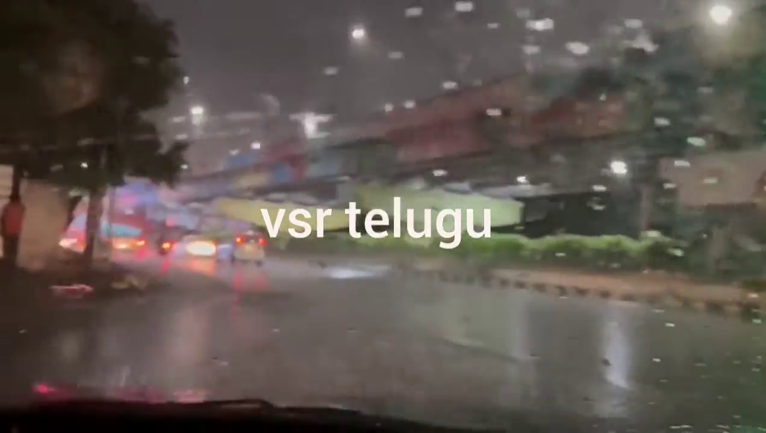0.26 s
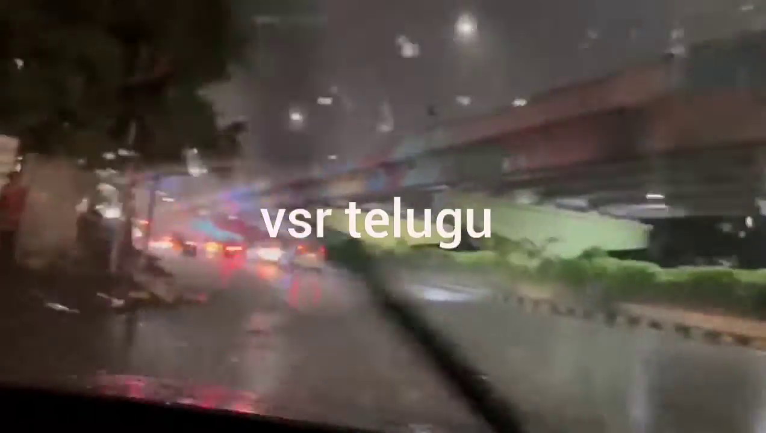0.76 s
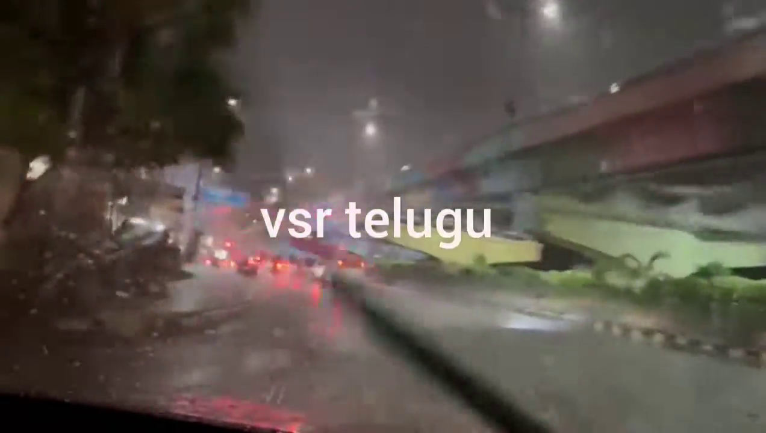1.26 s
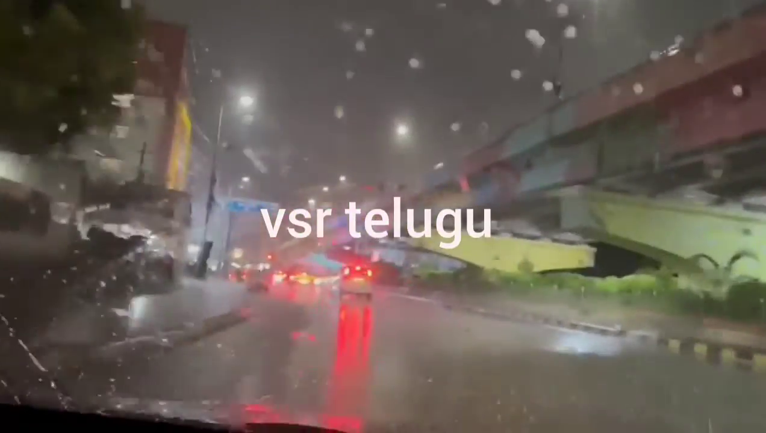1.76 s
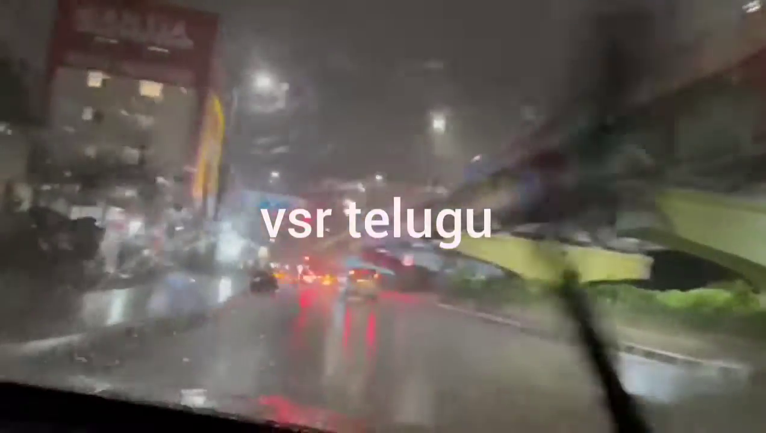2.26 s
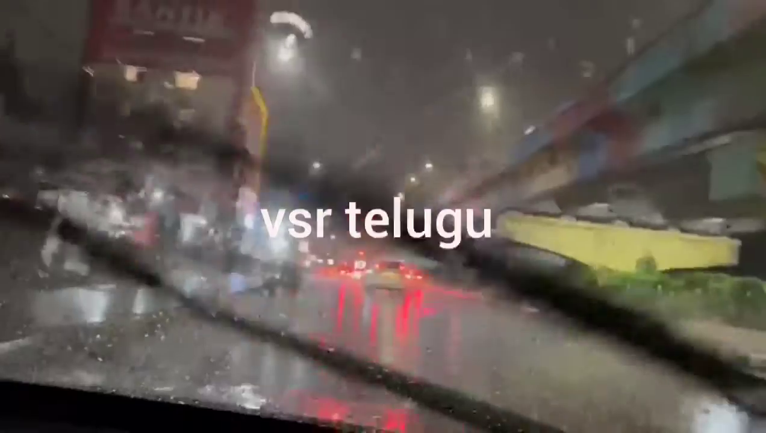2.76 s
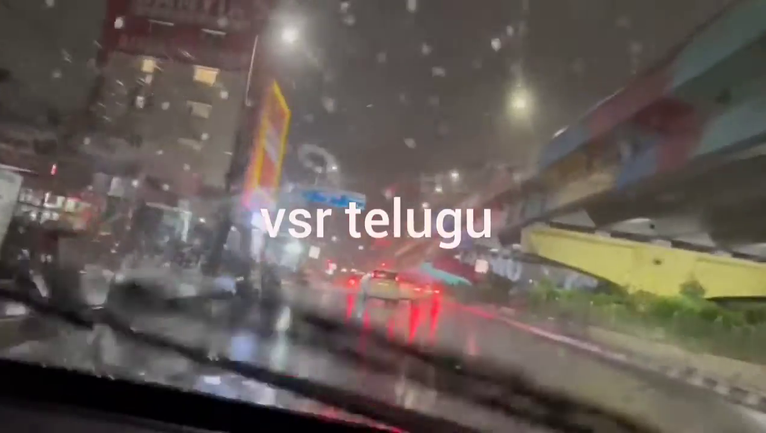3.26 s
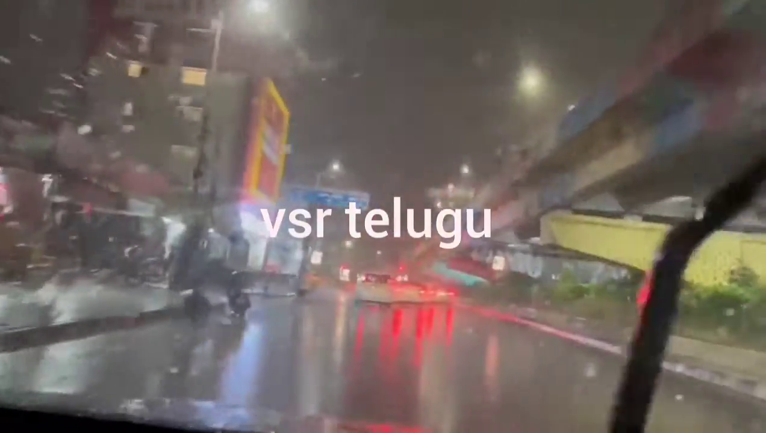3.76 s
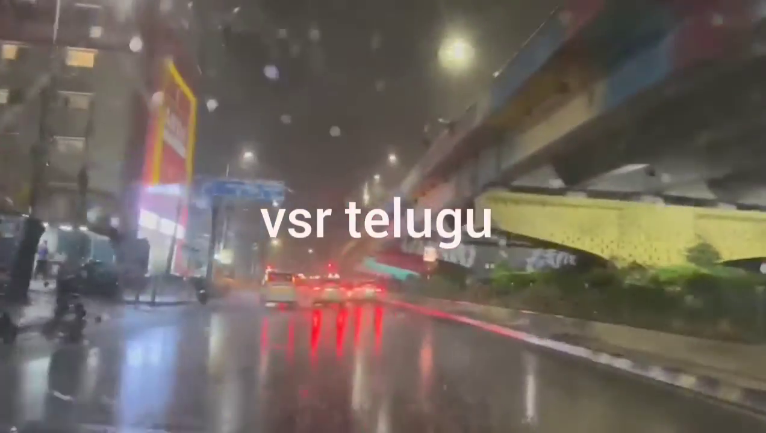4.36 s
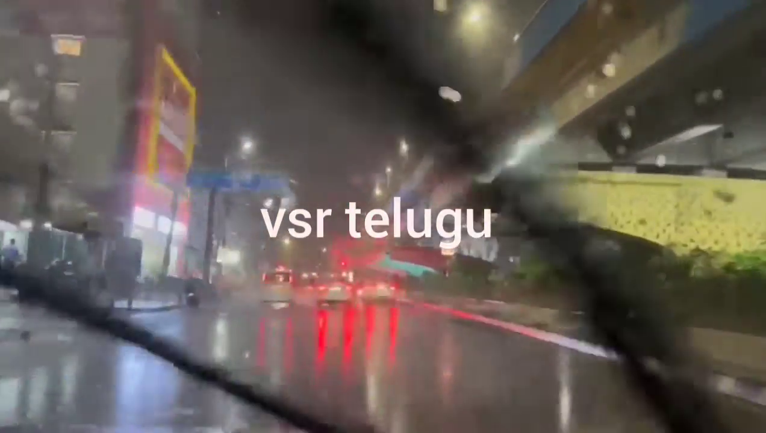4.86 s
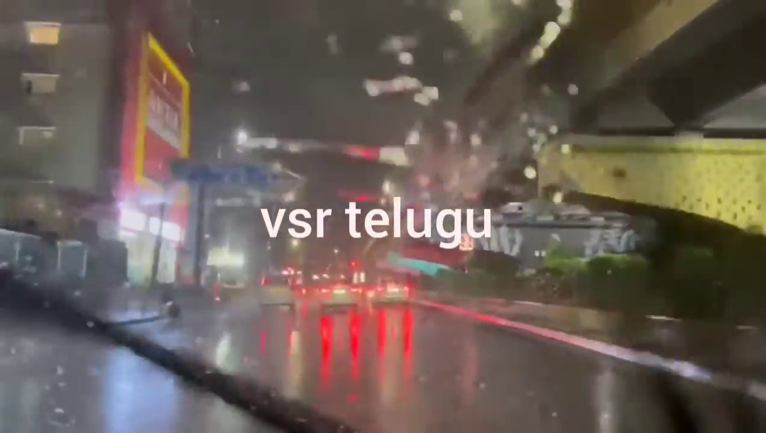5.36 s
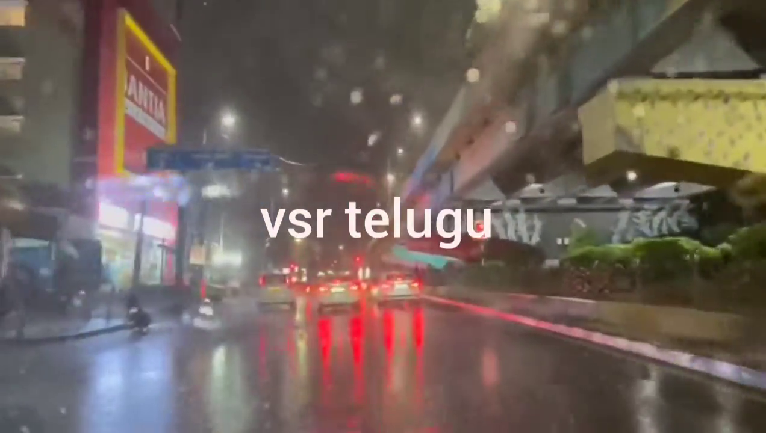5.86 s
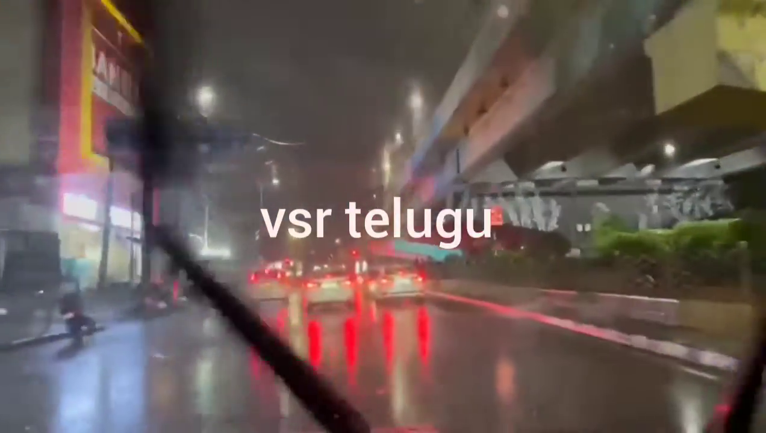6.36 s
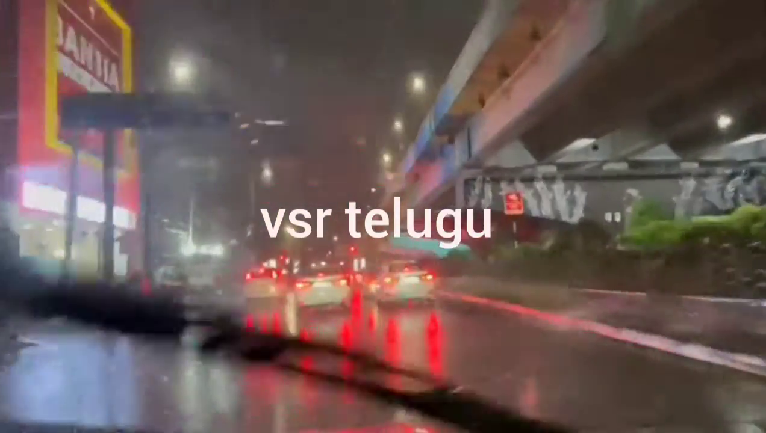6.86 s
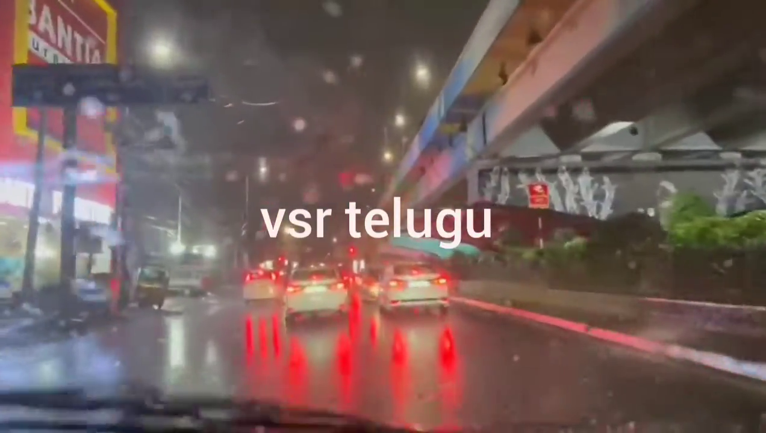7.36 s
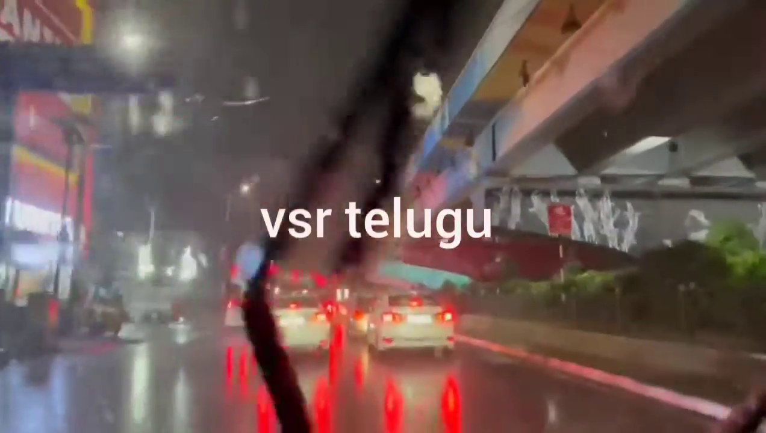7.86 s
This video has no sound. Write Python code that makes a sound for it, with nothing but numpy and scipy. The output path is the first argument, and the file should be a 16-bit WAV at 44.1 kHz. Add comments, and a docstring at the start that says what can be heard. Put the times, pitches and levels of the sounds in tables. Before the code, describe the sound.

Heavy rain crackles on a car's windscreen and roof, heard from inside, over low road rumble, with wiper thuds and faint rubber squeaks.

```python
"""Heavy rain patters on the roof and windscreen of a slowly moving car, heard from inside: filtered noise bursts.
Under it road and engine boom in the cabin's low modes, throbbing at bumps, and wet tyres hiss: noise and a hum.
The wiper blades thud at each end of their sweep (struck modes, noise swells and a low tone) and twice squeal
on the glass (wavering tones and narrow noise bands). Late on, one brief, very high, thin tone falls in pitch."""
import sys
import numpy as np
from scipy import signal
from scipy.fft import rfft, irfft, next_fast_len
from scipy.io import wavfile
from scipy.ndimage import uniform_filter1d, map_coordinates

SR = 44100
rng = np.random.default_rng(int(sys.argv[2]) if len(sys.argv) > 2 else 0)


def int16_out(signal):
    """Quantize to a 16-bit WAV file."""
    q = np.round(np.clip(np.atleast_2d(signal).T, -1, 1) * 32767)
    wavfile.write(sys.argv[1], SR, q.astype(np.int16))


N = 358533  # length in samples

# Course of the rain. Each row: time in seconds, patter level in dB before a common offset.
RAIN_LEVEL = [(0, -32), (.15, -35.5), (.3, -33.5), (.52, -36.5), (.65, -35), (1.27, -35.5), (1.86, -34),
              (2.42, -36), (2.85, -35.5), (3.45, -38), (4.1, -42.5), (4.27, -37), (4.7, -39.5), (5.08, -38),
              (5.48, -40), (5.8, -38), (6.5, -39.5), (8.13, -40.5)]
# Heavy drops on the glass. Each row: time in seconds, relative level in dB.
HEAVY_DROPS = [(0.1789, -27), (0.2348, -18), (0.2988, -18), (0.6029, -22), (0.7267, -22), (0.9744, -21),
               (0.9855, -23), (1.014, -29), (1.1736, -22.5), (1.353, -24.5), (1.5282, -25), (1.7359, -23.5),
               (1.7716, -21), (1.82, -23), (2.0005, -26), (2.8293, -23), (3.1644, -24), (3.9364, -23),
               (3.9634, -24), (4.0501, -24.5), (4.2296, -22), (4.2448, -21.5), (4.2844, -25.5),
               (5.0463, -21.5), (5.0817, -24), (5.1994, -24.5), (5.275, -23), (5.378, -22.5), (5.76, -22),
               (5.894, -21), (6.225, -21.5), (6.5121, -26), (6.7864, -25), (6.876, -25), (6.914, -24.5),
               (7.0102, -23), (7.1755, -25), (7.3162, -25.5), (7.599, -28), (7.639, -23), (7.9883, -20.5),
               (8.098, -25)]
# Drops in four pitch ranges, most frequent in the second. Each row: centre frequency in Hz, rate in drops per second.
DROP_RANGES = [(1600, 260), (3200, 430), (5500, 360), (9500, 310)]
# Overall colour of the patter, weaker near 8 kHz and ending near 12 kHz.
# Each row: frequency in Hz, relative density in dB per Hz.
PATTER_COLOUR = [(710, -30), (1200, -4), (1470, -1), (3580, -2.5), (6190, -8), (6800, -8.5), (7300, -14.5),
                 (8300, -18.5), (9350, -7), (10300, -18), (11200, -9.5), (11900, -73), (22000, -120)]
# Spectrum of a drop through the lined roof. Each row: frequency in Hz, relative density in dB per Hz.
ROOF_SPECTRUM = [(90, -21), (150, -7.5), (175, -4), (230, -9), (290, -11.5), (350, -11), (430, -12),
                 (470, -16.5), (570, -18), (950, -19), (1250, -20.5), (1600, -33), (3500, -120)]
ROOF_DB, ROOF_FOLLOWS = -33.5, 0.62  # roof taps: mean level in dB, share of the patter's swings in dB
HEAVY_TILT_DB = 2.5  # heavy drops grow brighter than the patter by this much per octave

# Slowly varying road boom under the bumps. Each row: time in seconds, floor boom in dB, cabin boom in dB.
ROAD_LEVEL = [(0.0, -31, -30), (0.5, -23.5, -26.5), (1.04, -26.5, -22.5), (2.67, -18.5, -26),
              (3.03, -28, -30), (5.05, -26.5, -26.5), (8.02, -28.5, -30)]
# Rough spots in the road. Each row: start in seconds, floor boom peak in dB, cabin boom peak in dB.
BUMPS = [(0.0, -36, -21), (0.33, -22, -34), (0.68, -23, -36), (1.3, -19, -35), (1.49, -47, -20),
         (1.82, -33, -20), (1.971, -40, -29), (2.1, -21, -25), (2.241, -84, -16.5), (2.609, -17, -19),
         (2.7, -17, -28), (3.0, -17.5, -24), (3.49, -19, -19), (3.62, -17.5, -27), (4.435, -31, -25),
         (5.07, -30, -21.5), (5.58, -18, -22), (5.87, -20, -35), (7.451, -24, -30), (7.65, -24.5, -35)]
FLOOR_RISE_S, CABIN_RISE_S = 0.023, 0.031  # time from a bump's start to its peak
# Floor pan modes. Each row: frequency in Hz, width in Hz, relative level in dB.
FLOOR_MODES = [(43.2, 9.3, 0.5), (61.7, 13.8, -1)]
# Cabin air modes. Each row: frequency in Hz, width in Hz, relative level in dB.
CABIN_MODES = [(77.5, 16.7, -4), (92.8, 16, -0.5), (126, 23.6, -3)]
# Firing hum of the engine. Each row: time in seconds, frequency in Hz, level in dB.
ENGINE_HUM = [(0, 56.9, -27), (3.2, 50, -37), (3.7, 47.06, -30.5), (5.2, 48, -25.5), (5.6, 50, -37),
              (8.13, 51.9, -57)]
# Wet tread, fading as the car slows. Each row: time in seconds, level in dB.
TYRE_LEVEL = [(0, -43.5), (1.5, -43.5), (3.3, -45.5), (4.2, -53), (8.13, -64)]
# Tread hiss bands. Each row: frequency in Hz, width in Hz, relative level in dB.
TREAD_BANDS = [(946, 100, 2.5), (1244, 120, -4)]

# Blade reversals, low and high end in turn. Each row: time in seconds, then relative levels in dB of
# the first arm's thud, the second arm's thud, the boom and the linkage knock.
REVERSALS = [(0.344, -14, -20, -16, -30.5), (1.124, -16, -15, -32, -31.5), (1.848, -20, -26, -12, -24.5),
             (2.559, -18.5, -13, -39, -35), (3.219, -36, -15, -16, -29.5), (3.917, -11, -22, -21.5, -31.5),
             (4.572, -23, -19, -19.5, -25), (5.272, -11.5, -23, -18, -27), (5.921, -17, -21, -13, -23.5),
             (6.633, -10, -27, -14.5, -30), (7.279, -17.5, -37, -14, -35), (8.02, -10, -15, -13.5, -25.5)]
# Lip flap, first at the low end and then at the high end. Each row: level in dB, rise in seconds.
LIP_FLAPS = [(-37.5, 0.008), (-42, 0.016)]
# Panel under the windscreen. Each row: frequency in Hz, width in Hz, relative level in dB.
SCUTTLE_MODES = [(163, 72, 7.5), (245, 180, -11)]
BOOM_HZ, BOOM_RISE_S = 89.5, 0.024  # the cabin mode that each reversal rings
# Rubber on glass. Each row: start in seconds, end in seconds, frequency in Hz, width in Hz,
# relative level in dB, left-right difference in dB.
SQUEALS = [(2.43, 2.76, 1630, 130, -47, -10), (2.54, 2.72, 2150, 260, -47, -7),
           (2.77, 3.03, 2190, 160, -45, -7), (2.79, 2.95, 3500, 900, -41, -3),
           (5.515, 5.59, 1830, 200, -43, -4), (5.51, 5.6, 2380, 220, -44, -5),
           (5.52, 5.95, 1715, 100, -43, -3), (5.64, 5.94, 2190, 110, -46, -6)]
TONE_SHARE = 0.45  # share of a squeal's power that is a wavering tone
# Brief high tone. Its one row: start in seconds, length in seconds, frequency in Hz, glide in Hz per second,
# level in dB, left-right difference in dB.
CHIRP = (7.698, .05, 10980, -6000, -33, -8)

# Likeness of the two channels. Each row: frequency in Hz, correlation of left and right.
CHANNEL_LIKENESS = [(60, 0.99), (130, 0.98), (270, 0.84), (570, 0.35), (1200, 0.11), (2550, 0.46),
                    (5400, 0.46), (11400, 0.11)]
# Colour of the two channels. Each row: frequency in Hz, left-right difference in dB.
CHANNEL_LEAN = [(60, 0), (170, -1), (490, 1.5), (1400, 0.5), (4000, 1.5), (11400, 0.0)]
# Paths to the two microphone ports differ. Each row: frequency in Hz, phase lead of the left in radians.
CHANNEL_LEAD = [(300, -0.075), (780, 0.9), (1980, -0.63), (3190, 1), (3960, -0.43), (6800, -0.23)]
TOP_HZ = 12000  # band limit


def amp(db):
    """Decibel law: the amplitude gain of a level in dB."""
    return 10 ** (np.asarray(db) / 20)


def unit(x):
    """Normalisation: scales a signal to rms 1."""
    return x / np.sqrt(np.mean(x ** 2) + 1e-20)


def along(points, hz):
    """Logarithmic pitch scale: interpolates (Hz, value) points on a log axis."""
    f, values = np.transpose(points)
    return np.interp(np.log(hz + 1), np.log(f + 1), values)


def curves(rows):
    """Linear interpolation in time: one value per sample for each column after the time."""
    seconds, *columns = np.transpose(rows)
    return [np.interp(np.arange(N) / SR, seconds, column) for column in columns]


def wobble(rate):
    """Slow random modulation: a smooth curve through random knots, rate knots a second."""
    knots = rng.standard_normal(int(N * rate / SR) + 4)
    return map_coordinates(knots, [np.arange(N) * rate / SR])


def swell(start, rise):
    """Critically damped envelope: rises to 1 in rise seconds, then dies away."""
    u = np.arange(SR // 2) / (SR * rise)
    out, first = np.zeros(N + SR), max(round(start * SR), 0)
    out[first:first + len(u)] = u * np.exp(1 - u)
    return out[:N]


def filtered(x, response):
    """Linear filtering: multiplies the spectrum of x by a complex response of frequency."""
    m = next_fast_len(N + SR // 2)
    spectrum = rfft(x, m) * response(np.fft.rfftfreq(m, 1 / SR))
    return irfft(spectrum, m)[..., :N]


def modes(table):
    """Modal superposition: the response of a few resonances, summed with alternating sign."""
    def response(f):
        total = 0
        for k, (centre, width, db) in enumerate(table):
            resonance = 1j * f * width / (centre ** 2 - f ** 2 + 1j * f * width)
            total = total + (-1) ** k * amp(db) * resonance
        return total
    return response


def heard(envelope, colour):
    """Partial coherence: coloured noise shared by two channels; rms 1 for an envelope of rms 1."""
    turn = lambda hz: np.arccos(np.clip(along(CHANNEL_LIKENESS, hz), -1, 1)) / 2
    scale = np.sqrt(np.mean(np.abs(colour(np.linspace(0, SR / 2, num=2 ** 15))) ** 2))
    split = lambda hz: colour(hz) / scale * [np.cos(turn(hz)), np.sin(turn(hz))]
    mid, side = filtered(rng.standard_normal((2, N)) * envelope, split)
    return np.array([mid + side, mid - side])


def dying(power, t60, tick=0):
    """Reverberant decay: each impact's power gives a short contact tick and a ring that builds and dies."""
    keep = amp(-120 / (t60 * SR))  # power falls by 60 dB in t60 seconds
    spread, brief = np.exp(-1 / (0.0068 * SR)), np.exp(-1 / (0.0005 * SR))  # build-up of ring, of tick
    ring = signal.lfilter([1 - spread], np.convolve([1, -keep], [1, -spread]), power)
    contact = signal.lfilter([1 - brief], np.convolve([1, -brief], [1, -brief]), power)
    return ring + tick * contact * np.e


def patter(per_s, spread_db, top_db, t60, tick):
    """Shot noise: a power envelope of mean 1 from random drops of uneven size."""
    hits = rng.random(N) < per_s / SR
    sizes_db = np.minimum(spread_db * rng.exponential(size=N), top_db)
    power = dying(hits * amp(2 * sizes_db), t60, tick)
    return power / power.mean()


def flicker(x, depth):
    """Time-frequency modulation: the level drifts in patches, by a depth given as (Hz, dB) points."""
    hz, _, z = signal.stft(x, SR, nperseg=512)
    field = rng.standard_normal(z.shape[1:])
    field = uniform_filter1d(field, size=5, axis=0)
    field = unit(uniform_filter1d(field, size=9, axis=1))
    gain = amp(along(depth, hz)[:, None] * field)
    gain /= np.sqrt(np.mean(gain ** 2, axis=1, keepdims=True))
    return signal.istft(z * gain, SR, nperseg=512)[1][:, :N]


def rain():
    """Impact noise: ticks on the glass in four pitch ranges and duller taps through the roof; gusts bunch them."""
    level_db, = curves(RAIN_LEVEL)
    gust_db = 0.3 * wobble(8.2) + 0.74 * wobble(25)
    heavy_s, heavy_db = np.transpose(HEAVY_DROPS)
    # close drops crack at all pitches at once
    near = patter(per_s=170, spread_db=4.0, top_db=11.5, t60=0.034, tick=1.2)
    centres = np.log([hz for hz, _ in DROP_RANGES])
    glass, grid = 0, np.linspace(0, SR / 2, num=2 ** 12)
    for own, (hz, per_s) in zip(np.eye(len(centres)), DROP_RANGES):
        # neighbouring ranges cross-fade so that their powers add up to the whole spectrum
        range_gain = lambda f: np.sqrt(np.interp(np.log(f + 1), centres, own))
        colour = lambda f: amp(along(PATTER_COLOUR, f)) * range_gain(f)
        share = np.linalg.norm(colour(grid)) / np.linalg.norm(amp(along(PATTER_COLOUR, grid)))
        small = patter(per_s, spread_db=6.0, top_db=12.5, t60=0.014, tick=0.72)
        power = 0.5 + 0.43 * small + 0.38 * near  # the first part is the blur of all far drops
        tilt_db = HEAVY_TILT_DB * np.log2(hz / 3200)
        heavy = np.zeros(N)
        heavy[np.round(heavy_s * SR).astype(int)] = amp(2 * (heavy_db - 8.5 + tilt_db))
        heavy = dying(heavy, t60=0.028, tick=1.7)
        light = amp(2 * (level_db + 0.41 + gust_db)) * power
        glass = glass + share * heard(np.sqrt(light + heavy), colour)
    taps = patter(per_s=180, spread_db=2.5, top_db=7.5, t60=0.034, tick=0)
    roof_db = ROOF_DB + ROOF_FOLLOWS * (level_db - level_db.mean()) + 1.3 * gust_db
    roof = amp(roof_db) * np.sqrt(0.91 + 0.42 * taps)
    both = glass + heard(roof, lambda hz: amp(along(ROOF_SPECTRUM, hz)))
    # the treble near 8 kHz flickers most
    return flicker(both, [(200, 0.98), (1500, 1.08), (6000, 1.0), (8000, 9.4), (11000, 3.4)])


def road():
    """Forced resonance: tyres and engine shake the floor pan and cabin air; each bump makes both throb."""
    floor_db, cabin_db = curves(ROAD_LEVEL)
    floor_bumps = sum((amp(db) * swell(s, FLOOR_RISE_S)) ** 2 for s, db, _ in BUMPS)
    cabin_bumps = sum((amp(db) * swell(s, CABIN_RISE_S)) ** 2 for s, _, db in BUMPS)
    floor = np.sqrt(amp(2 * floor_db) + floor_bumps) * amp(0.34 * wobble(4.4))
    cabin = np.sqrt(amp(2 * cabin_db) + cabin_bumps) * amp(1.35 * wobble(16))
    # little passes below 28 Hz or above 140 Hz
    boom_band = lambda hz: (hz / 28) ** 3 / (1 + (hz / 28) ** 3) / (1 + (hz / 140) ** 6)
    floor_boom = heard(floor, lambda hz: modes(FLOOR_MODES)(hz) * boom_band(hz))
    return floor_boom + heard(cabin, lambda hz: modes(CABIN_MODES)(hz) * boom_band(hz))


def engine():
    """Periodic excitation: a low, slightly unsteady hum at the firing rate."""
    hz, db = curves(ENGINE_HUM)
    phase = 2 * np.pi * np.cumsum(hz + 1.45 * wobble(5.5)) / SR
    return np.sqrt(2) * amp(db + 0.91 * wobble(6.6)) * np.sin(phase)


def tyres():
    """Band-limited noise: the tread hisses on the wet road in two soft bands."""
    db, = curves(TYRE_LEVEL)
    colour = lambda hz: modes(TREAD_BANDS)(hz) / (1 + (hz / 1800) ** 4)
    return heard(amp(db + 1.2 * wobble(9)), colour)


def wipers():
    """Impulsive excitation: at reversals the lip flaps, the linkage rattles, and jolts ring panel and cabin."""
    jolt, shudder, boom, flap, knock = np.zeros((5, N))
    for k, (s, first_db, second_db, boom_db, knock_db) in enumerate(REVERSALS):
        flap_db, flap_rise = LIP_FLAPS[k % 2]
        flap += amp(flap_db) * swell(s - 0.02, flap_rise)  # the lip turns over along its length
        knock += amp(knock_db) * swell(s - 0.008, 0.0081)
        shudder += amp(first_db - 12.5) * swell(s - 0.022, 0.02)  # the arm shakes as it brakes
        jolt[round((s + 0.004) * SR)] = amp(first_db + 33.5)
        jolt[round((s + 0.028) * SR)] = -amp(second_db + 38.0)
        boom += amp(boom_db) * swell(s, BOOM_RISE_S)
    # rubber and felt pass no treble
    soft = lambda table, hz_top: lambda hz: modes(table)(hz) / (1 + 1j * hz / hz_top) ** 3
    panel = filtered(jolt, soft(SCUTTLE_MODES, 250)) + heard(shudder, soft(SCUTTLE_MODES, 180))
    linkage = heard(knock, soft([(364, 51, 0)], 910))
    lip = heard(flap, soft([(800, 350, 0)], 1640))
    cabin = boom * np.sin(2 * np.pi * BOOM_HZ * np.arange(N) / SR)
    return panel + linkage + lip + cabin


def panned(db, pan_db):
    """Level difference: left and right gains, pan_db apart about db."""
    return amp(db + pan_db / 2 * np.array([[1], [-1]]))


def squeals():
    """Stick-slip friction: where the glass is drier the rubber gives wavering tones in rough narrow bands."""
    t, out = np.arange(N) / SR, 0
    for start, end, hz, width_hz, db, pan_db in SQUEALS:
        # catches at once, fades slowly
        fade = np.clip((t - start) / 0.012, 0, 1) * np.clip((end - t) / 0.04, 0, 1)
        slips = fade * unit(amp(1.5 * wobble(40)))
        phase = 2 * np.pi * np.cumsum(hz + 0.4 * width_hz * wobble(40)) / SR
        tone = slips * np.sqrt(2) * np.sin(phase)
        band = modes([(hz, width_hz, 0)])
        rough = heard(slips, lambda f: band(f) ** 2)
        sound = np.sqrt(TONE_SHARE) * tone + np.sqrt(1 - TONE_SHARE) * rough
        out = out + panned(db, pan_db) * sound
    return out


def chirp():
    """Linear frequency glide: one thin falling tone under a half-sine envelope."""
    start, length, hz, glide, db, pan_db = CHIRP
    t = np.clip(np.arange(N) / SR - start, 0, length)
    tone = np.sin(np.pi * t / length) * np.sin(2 * np.pi * (hz + glide * t / 2) * t)
    return panned(db, pan_db) * tone


def scene():
    """Linear superposition: the sum of all layers."""
    return rain() + road() + engine() + tyres() + wipers() + squeals() + chirp()


def record(dry):
    """Interchannel differences: two ports differ in colour and phase; nothing is kept above the band limit."""
    ports = np.array([[1], [-1]]) / 2
    colour = lambda hz: amp(along(CHANNEL_LEAN, hz) * ports)
    phase = lambda hz: np.exp(1j * along(CHANNEL_LEAD, hz) * ports)
    return filtered(dry, lambda hz: colour(hz) * phase(hz) * (hz < TOP_HZ))


dry = scene()
out = record(dry)
int16_out(out)
```